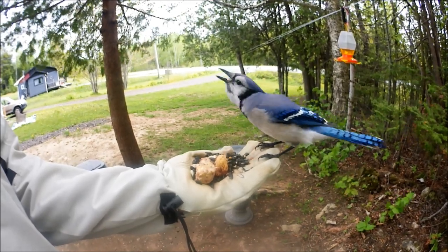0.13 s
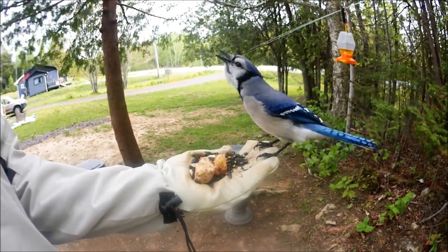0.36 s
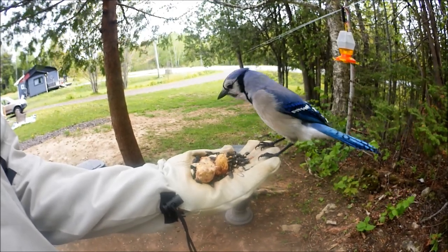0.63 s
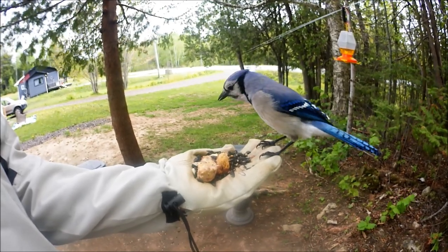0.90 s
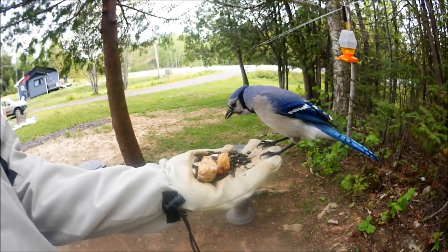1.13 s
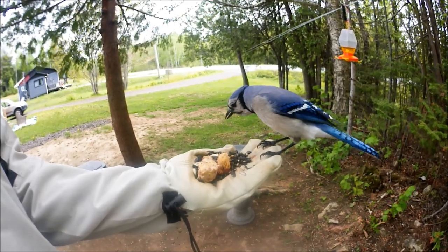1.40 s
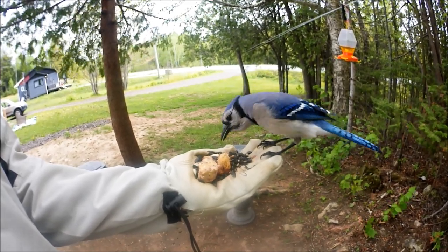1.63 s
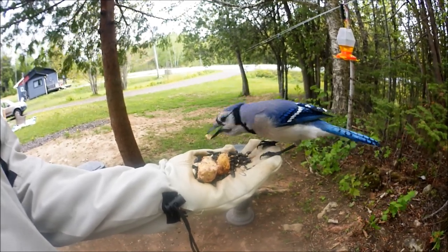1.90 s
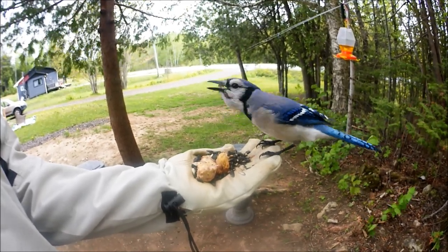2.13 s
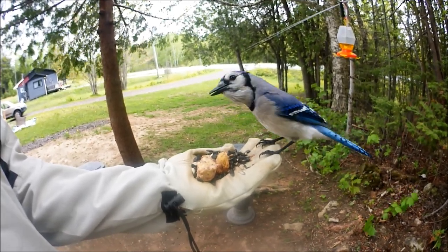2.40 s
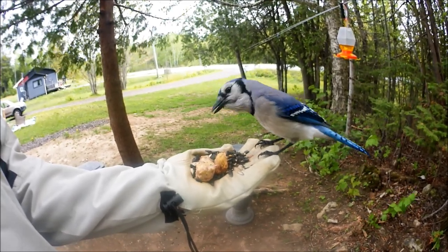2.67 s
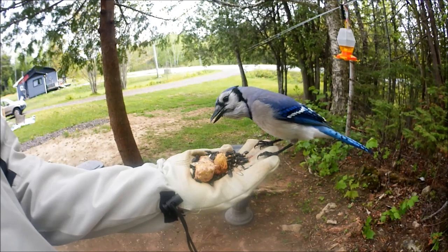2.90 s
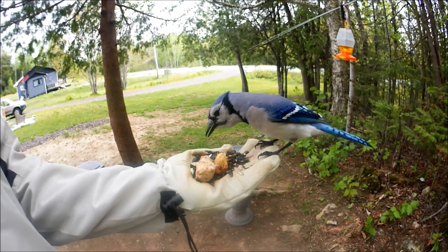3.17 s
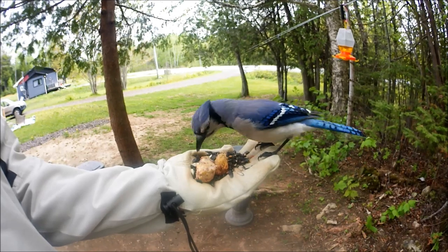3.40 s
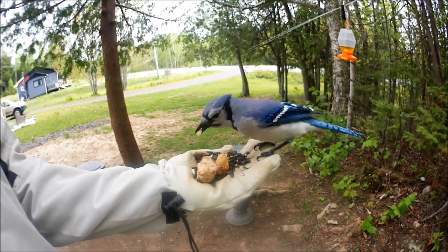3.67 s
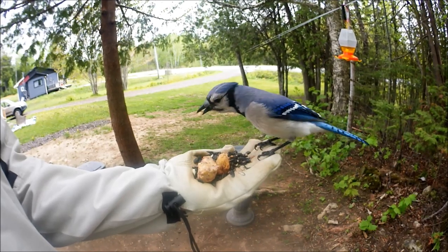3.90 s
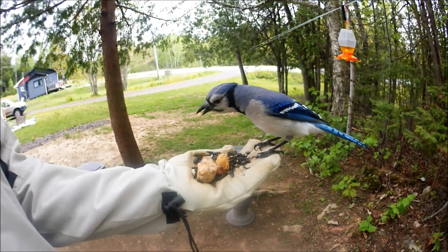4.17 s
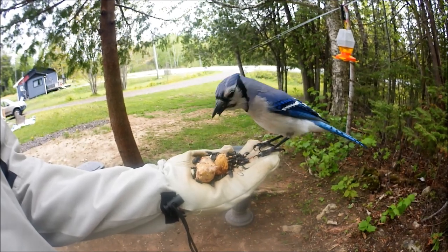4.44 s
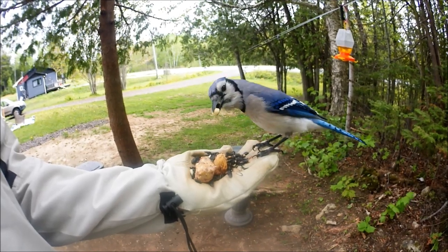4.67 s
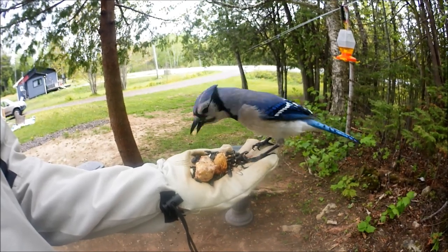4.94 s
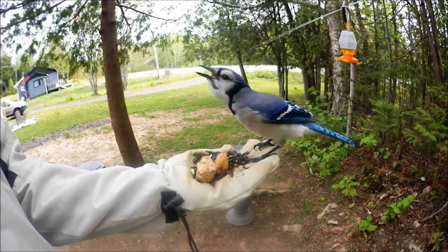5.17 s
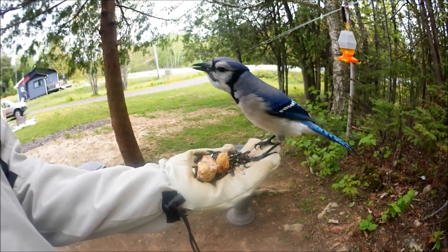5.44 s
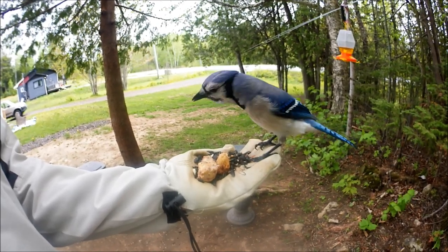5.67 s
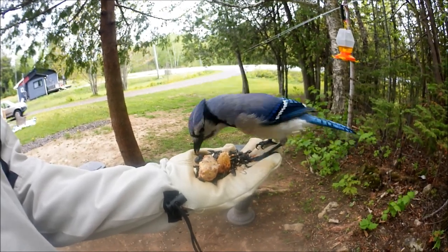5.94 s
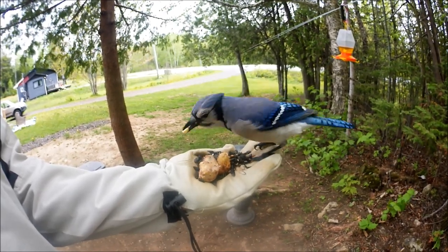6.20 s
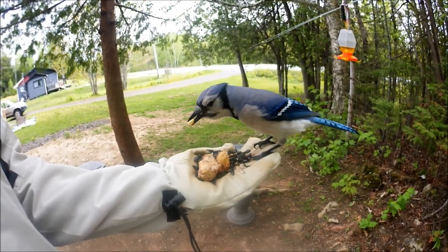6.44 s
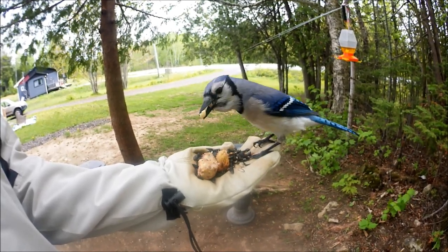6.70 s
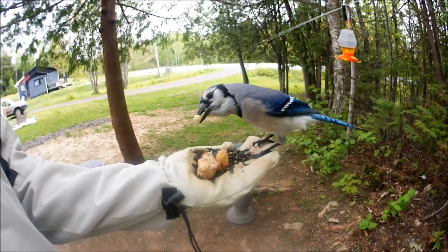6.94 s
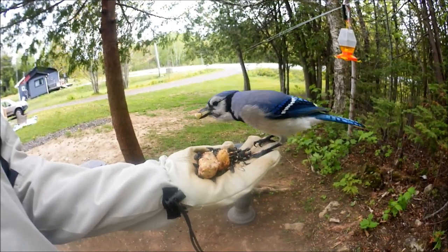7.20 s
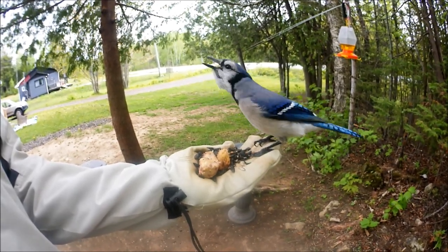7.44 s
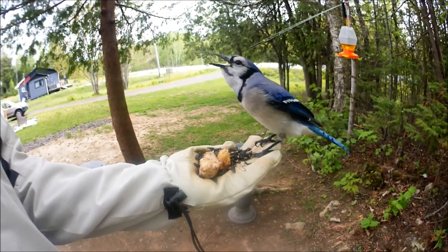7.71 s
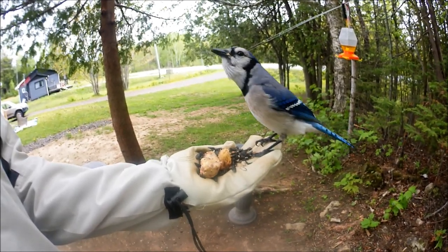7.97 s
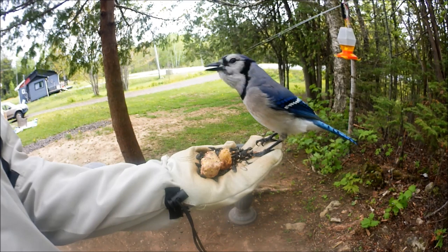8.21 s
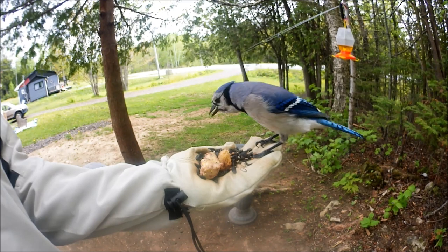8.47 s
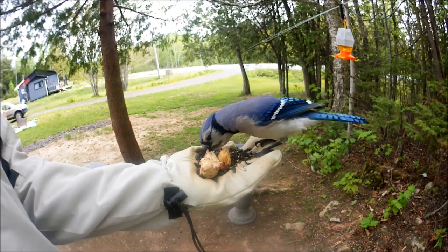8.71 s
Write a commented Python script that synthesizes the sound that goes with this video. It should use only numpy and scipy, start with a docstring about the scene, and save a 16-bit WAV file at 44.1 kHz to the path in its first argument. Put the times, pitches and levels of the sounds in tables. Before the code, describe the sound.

Outdoors at a woodland edge, a hand-held stereo microphone is struck by lumpy low wind thumps for the first second. The wind drops to faint puffs, then calm. Small songbirds whistle, chirp and buzz, thickening into a quick sliding warble midway, then thinning. A jay close by makes small hollow clicks cracking seeds, over soft hiss and distant traffic hum.

```python
"""Small songbirds whistle, warble and buzz among trees: gliding sines and fast sweeps, scattered by the leaves.
A jay close by clicks seeds in its bill, edges ringing a small cavity, and rustles in grainy bursts of treble.
A far flock blurs into twitter. Gusts buffet the two microphone ports of a hand-held camera at first and
die away, as lumpy noise and single eddies; distant traffic hums under the preamp's hiss and a faint whine."""
import sys
import numpy as np
from scipy import signal
from scipy.fft import rfft, irfft
from scipy.io import wavfile
from scipy.ndimage import uniform_filter1d, map_coordinates

SR = 44100
rng = np.random.default_rng(int(sys.argv[2]) if len(sys.argv) > 2 else 0)


def ratio_of_db(decibels):
    """Turn decibels (scalar or array-like) into linear amplitude factors; 0 dB maps to 1."""
    return 10 ** (np.asarray(decibels, float) / 20)


def bounce(signal):
    """Save signal as a 16-bit WAV file at the path given by the first command-line argument."""
    frames = np.transpose(np.atleast_2d(signal))
    limited = np.clip(frames, -1, 1)
    pcm = np.round(limited * 32767).astype(np.int16)
    wavfile.write(sys.argv[1], SR, pcm)


N = 389844
TIME = np.arange(N) / SR
PORTS = np.array([[1], [-1]])  # signs of the left and right port

# spectrum of floor noise: (frequency [Hz], relative density [dB])
FLOOR_SPECTRUM = [(15, -50), (25, -23.5), (194, -1.5), (380, 3), (2130, -5), (3280, -6.5), (4290, -9),
                  (5620, -2.5), (8200, -12), (11600, -10.5), (14100, -12.5), (15600, -18.5)]
# how alike the floor is at both ports: (frequency [Hz], left-right correlation [0..1])
FLOOR_CORRELATION = [(60, 0.49), (300, 0.44), (1400, 0.27), (6000, 0), (16000, 0)]
# spectrum of wind turbulence: (frequency [Hz], relative density [dB])
WIND_SPECTRUM = [(15, -56), (25, 7), (80, -9), (160, 0.5), (338, -5.5), (712, -9.5), (1190, -21.5),
                 (1770, -30), (2620, -38), (3500, -44), (4550, -53), (7700, -120)]
# gusts on the ports: (start [s], hold [s], left rumble before trim [dB], right rumble before trim [dB])
GUST_HOLDS = [(0.0, 0.13, -29.5, -25), (0.174, 0.042, -32.5, -28), (0.234, 0.045, -27.5, -31),
              (0.401, 0.063, -33, -28.5), (0.536, 0.012, -28, -20), (0.57, 0.054, -26, -19),
              (0.635, 0.041, -21.5, -27.5), (0.709, 0.015, -37, -28), (0.777, 0.078, -32, -28.5),
              (0.883, 0.028, -32.5, -24), (1.007, 0.13, -50.5, -39.5), (1.088, 3.45, -67, -60),
              (1.526, 0.27, -62, -50), (1.93, 0.2, -69, -47.5), (2.193, 0.197, -57, -46.5),
              (2.534, 0.093, -58, -46.5), (2.791, 0.061, -53, -43.5), (3.242, 0.13, -48.5, -41.5),
              (3.444, 0.02, -61, -41), (3.558, 0.031, -49, -40.5), (3.767, 0.091, -48, -38.5)]
# hardest single eddies: (time [s], peak of the thump [dB], port struck [L or R])
HARD_EDDIES = [(.016, -13, "R"), (0.042, -5, "R"), (.071, -6, "R"), (0.084, -14, "L"), (.108, -14, "L"),
               (.13, -15, "R"), (0.135, -14, "L"), (0.173, -18, "R"), (0.2, -18, "L"), (.207, -13.5, "R"),
               (.247, -10, "L"), (.248, -15, "R"), (.267, -15.5, "R"), (.295, -19, "R"), (.413, -13.5, "R"),
               (0.441, -19, "L"), (0.505, -17.5, "R"), (0.539, -13.5, "R"), (.562, -14, "R"),
               (0.565, -25, "L"), (0.578, -4, "R"), (0.608, -8.5, "L"), (.613, -8, "R"), (0.639, -6, "L"),
               (0.656, -6.5, "R"), (.658, -4, "L"), (0.679, -20, "L"), (.714, -14, "R"), (0.75, -20, "R"),
               (.783, -21, "R"), (0.8, -18, "R"), (0.821, -20, "R"), (0.833, -17, "L"), (0.885, -13, "R"),
               (0.91, -10.5, "R"), (2.331, -23, "R"), (2.566, -28, "R"), (2.833, -26, "R"),
               (3.271, -27, "L"), (3.315, -28, "L"), (3.336, -21.5, "R"), (3.347, -18, "R"),
               (3.444, -27.5, "R"), (3.575, -26, "R"), (3.78, -26.5, "L"), (3.802, -24, "R"),
               (3.846, -25, "R")]
# far flock before the trees: (time [s], low singers' level [dB], high singers' level [dB])
FLOCK_LEVELS = [(0.0, -53.5, -56), (.47, -58.5, -50), (.75, -62, -70), (1.4, -67, -79), (2.02, -54, -53.5),
                (2.31, -51, -53.5), (2.95, -49.5, -51), (3.25, -55, -63), (3.65, -47.5, -44),
                (4.0, -51.5, -55.5), (4.6, -43.5, -54), (4.9, -43.5, -76), (5.2, -48.5, -59),
                (5.55, -44, -49), (5.95, -61.5, -53), (6.6, -82, -64), (7.3, -55.5, -87),
                (7.68, -62, -54.5), (8.64, -63.5, -74), (8.84, -51, -44)]
# dry rustles close by, perhaps feathers: (start [s], length [s], centre [Hz], level [dB])
RUSTLE_BURSTS = [(0.322, 0.074, 7000, -54), (4.582, .035, 9500, -51.5), (4.69, 0.047, 8260, -51)]
# seeds cracked in the bill: (time [s], ring peak before panning [dB], cavity pitch [Hz], edge over ring [dB])
SEED_CRACKS = [(0.182, -30, 2800, -7.5), (0.3077, -30.5, 2920, -3), (0.4315, -32.5, 2980, -2),
               (0.554, -28, 3050, -11), (0.6428, -28, 3140, -5), (2.3283, -28.5, 3200, -8),
               (3.6566, -30.5, 2500, 5), (2.428, -33, 2800, -12), (3.734, -39, 2600, 9),
               (5.0217, -35, 3420, -2), (5.3148, -21, 3140, -9.5), (5.4241, -26, 3020, -11),
               (5.4298, -29, 2700, -15), (5.7092, -34.5, 2710, -8), (6.1565, -29.5, 2400, 4),
               (6.198, -41, 2640, 7), (7.2681, -36.5, 3900, 5), (7.4986, -24.5, 2800, -13),
               (7.6145, -35.5, 2440, -20), (7.833, -36.5, 2560, -8), (7.9446, -32, 2430, -16),
               (8.0882, -39, 3420, 10)]
# nearest singer, one table a phrase: (time [s], pitch [Hz], level before rasp and panning [dB])
WARBLE_PHRASES = [
    [(4.219, 3130, -40), (4.232, 3400, -36), (4.253, 4150, -38), (4.268, 3850, -34), (4.285, 2870, -34),
     (4.298, 2523, -54), (4.312, 2910, -39), (4.33, 3160, -29), (4.338, 2694, -39), (4.35, 3456, -33),
     (4.365, 3510, -31.5), (4.385, 3450, -38)],
    [(4.483, 3820, -44), (4.513, 3050, -27.5), (4.54, 2680, -42), (4.565, 3160, -29.5), (4.574, 3230, -40)],
    [(4.575, 4220, -50), (4.591, 3390, -33.5), (4.615, 2700, -35.5), (4.628, 2700, -47), (4.644, 3135, -32),
     (4.651, 2670, -43), (4.685, 2460, -37), (4.71, 2410, -48)],
    [(4.8, 2740, -50), (4.815, 3100, -33.5), (4.824, 3504, -35), (4.837, 3030, -33), (4.865, 2660, -43)],
    [(4.884, 3080, -46), (4.892, 3363, -38), (4.901, 3795, -50), (4.915, 3280, -30), (4.935, 2575, -46),
     (4.948, 2544, -43), (4.963, 2740, -32), (4.977, 2640, -41)],
    [(5.042, 3480, -49), (5.052, 3314, -29.5), (5.062, 2830, -46), (5.074, 3340, -35), (5.088, 4180, -43),
     (5.103, 4450, -33), (5.118, 4110, -41), (5.134, 3840, -34)],
    [(5.13, 3410, -44), (5.144, 3060, -35.5), (5.182, 2850, -32.5), (5.215, 2760, -37), (5.232, 2450, -48)],
    [(5.222, 2820, -39), (5.236, 3220, -30), (5.248, 3820, -44), (5.26, 3090, -33), (5.278, 2850, -44)],
    [(5.404, 4180, -46), (5.414, 4650, -36), (5.435, 3750, -37.5), (5.452, 3400, -39), (5.462, 3400, -55)],
]
# whistled notes: (start [s], length [s], start pitch [Hz], end pitch [Hz], level before distance and trim [dB])
WHISTLED_NOTES = [(0.222, 0.016, 5260, 5550, -43.5), (0.658, 0.023, 3320, 3500, -44.5),
                  (0.842, 0.057, 4640, 3620, -49.5), (0.852, 0.031, 5140, 4480, -54),
                  (0.978, 0.033, 5870, 4700, -51), (0.982, 0.044, 4550, 3940, -48),
                  (1.014, 0.026, 3980, 3240, -53.5), (1.107, 0.081, 4520, 3320, -50.5),
                  (1.165, 0.015, 5000, 3870, -42), (1.181, .01, 5500, 5410, -42),
                  (1.19, 0.027, 5300, 3750, -43.5), (1.196, 0.033, 6660, 5620, -51),
                  (1.147, 0.042, 4580, 5080, -48.5), (1.228, 0.067, 5740, 5300, -51),
                  (1.263, 0.031, 4000, 5100, -51), (1.289, 0.018, 4860, 4670, -42.5),
                  (1.302, 0.025, 4650, 3920, -49.5), (1.534, 0.023, 3360, 3570, -56.5),
                  (1.596, 0.024, 4500, 4900, -50.5), (1.672, 0.034, 3390, 3570, -59),
                  (1.817, 0.027, 3620, 3450, -54), (1.888, 0.018, 4590, 5030, -46),
                  (1.545, 0.018, 5200, 4740, -54), (1.692, 0.038, 5470, 4600, -57),
                  (2.011, 0.035, 4240, 4105, -52.5), (2.097, 0.047, 3200, 2490, -53),
                  (2.148, .015, 4700, 4900, -43), (2.156, 0.047, 4990, 3460, -43),
                  (2.221, 0.064, 5470, 4560, -42.5), (2.26, 0.057, 5240, 4480, -48),
                  (2.269, 0.048, 4360, 3165, -43), (2.29, 0.021, 3620, 3250, -51),
                  (2.378, 0.034, 3750, 4380, -56), (2.379, 0.018, 5260, 5330, -51.5),
                  (2.468, 0.019, 3230, 3370, -53), (2.657, .02, 3950, 3970, -54),
                  (2.498, 0.043, 3820, 4490, -53), (2.669, 0.023, 5600, 4560, -44),
                  (2.774, 0.028, 4500, 4700, -53), (2.83, 0.048, 5060, 4430, -51),
                  (2.874, 0.023, 4600, 4600, -60), (2.767, 0.092, 2535, 2794, -55),
                  (2.781, 0.049, 6150, 4900, -41), (2.948, 0.022, 4440, 5440, -47.5),
                  (2.912, 0.036, 2980, 3520, -55), (2.999, 0.13, 2920, 2680, -54.5),
                  (3.0, 0.064, 5980, 4670, -46), (3.227, 0.033, 6120, 5600, -53.5),
                  (3.27, .022, 5600, 4260, -51), (3.452, 0.029, 6170, 5640, -46),
                  (3.455, 0.033, 2570, 3070, -52), (3.561, 0.088, 4030, 5620, -45),
                  (3.585, 0.051, 3200, 4360, -46.5), (3.504, .025, 5750, 5750, -55),
                  (3.665, .03, 5560, 5500, -48), (3.722, 0.061, 4680, 4730, -48.5),
                  (3.803, .02, 2830, 2940, -46), (3.722, 0.049, 2800, 2400, -57),
                  (3.759, 0.03, 3860, 5000, -49), (3.763, 0.032, 2460, 3350, -45),
                  (3.773, 0.027, 4900, 5170, -42.5), (3.795, 0.048, 5240, 3700, -48.5),
                  (3.862, 0.051, 3090, 2510, -45), (3.89, 0.044, 5000, 6460, -42.5),
                  (3.919, 0.031, 2480, 3270, -41), (3.951, 0.024, 3066, 2900, -39.5),
                  (3.968, 0.017, 3050, 2600, -51), (4.015, 0.016, 3680, 3800, -53),
                  (4.03, 0.021, 3900, 2650, -39.5), (4.046, .015, 3060, 3700, -39),
                  (4.053, 0.024, 3520, 2970, -40.5), (4.086, 0.027, 3520, 3620, -46),
                  (4.125, 0.042, 4030, 4730, -42), (4.165, 0.018, 5700, 5070, -39),
                  (4.244, 0.036, 5780, 6240, -42.5), (4.243, 0.051, 7580, 6860, -52),
                  (4.411, 0.037, 3560, 4320, -43), (4.425, 0.025, 5860, 6070, -41.5),
                  (4.423, 0.041, 4730, 3830, -38.5), (4.46, 0.036, 3930, 4360, -44),
                  (4.595, 0.018, 6010, 5660, -38.5), (4.678, 0.032, 5700, 4040, -48),
                  (4.769, 0.011, 3950, 4540, -43), (4.779, 0.018, 4750, 3580, -43),
                  (4.843, 0.025, 4130, 4020, -51), (4.863, 0.032, 3710, 3760, -43.5),
                  (5.028, 0.019, 4210, 3930, -43.5), (5.114, 0.019, 4430, 4520, -45.5),
                  (5.151, 0.048, 8140, 6260, -50.5), (5.367, 0.014, 5520, 4630, -43.5),
                  (5.537, 0.035, 3190, 2360, -58), (5.659, 0.04, 5370, 4140, -41.5),
                  (5.668, 0.029, 3900, 2380, -52), (5.772, 0.04, 4900, 3460, -45),
                  (5.984, 0.047, 6570, 4900, -43.5), (6.063, 0.042, 2890, 2880, -59.5),
                  (6.097, .035, 3900, 4020, -58), (6.145, 0.039, 7030, 7400, -49),
                  (6.184, 0.046, 7550, 5830, -50), (6.206, 0.062, 6330, 4740, -46.5),
                  (6.402, 0.061, 6960, 4460, -47), (6.605, 0.012, 6420, 4380, -43),
                  (6.69, 0.045, 3380, 2480, -50), (6.84, .03, 4987, 4850, -46),
                  (6.854, 0.054, 4930, 3200, -42), (6.997, 0.043, 4120, 2770, -51),
                  (7.039, 0.05, 2860, 2920, -59), (7.121, 0.046, 3240, 3820, -49),
                  (7.282, 0.031, 3850, 3900, -59), (7.304, 0.034, 3970, 3600, -54),
                  (7.307, 0.059, 2765, 3650, -50), (7.413, 0.033, 4860, 4030, -52),
                  (7.48, 0.05, 5600, 6480, -48), (7.683, .036, 3110, 2300, -56),
                  (7.682, 0.013, 4700, 4550, -56), (7.801, .022, 3610, 3440, -55),
                  (7.694, 0.028, 5600, 4820, -49), (7.768, 0.027, 4750, 3940, -50),
                  (7.856, 0.055, 4810, 4450, -46), (7.888, 0.051, 4490, 3450, -48.5),
                  (7.954, 0.022, 3500, 3540, -54), (8.002, 0.032, 4800, 4390, -51),
                  (8.045, 0.031, 3750, 3000, -54), (8.097, 0.02, 3410, 3560, -57.5),
                  (8.166, 0.038, 4470, 4900, -53), (8.245, 0.036, 3485, 3430, -57.5),
                  (8.273, 0.04, 3350, 2270, -59), (8.33, 0.042, 5600, 5060, -50.5),
                  (8.353, 0.055, 4810, 4060, -47), (8.415, 0.084, 4980, 3720, -49.5),
                  (8.58, 0.054, 4350, 3060, -54), (8.6, 0.052, 5440, 5050, -44),
                  (8.636, 0.041, 5140, 4360, -49), (8.741, 0.013, 4160, 4000, -49.5),
                  (8.747, 0.021, 5370, 5380, -46.5), (8.763, 0.023, 5400, 4770, -48.5),
                  (8.777, 0.077, 5010, 4080, -46)]
# buzzy calls: (start [s], length [s], sweep width [Hz], level before distance and trim [dB])
BUZZY_CALLS = [(0.252, 0.013, 2480, -41), (0.314, 0.073, 2210, -46), (0.462, 0.03, 1970, -40),
               (0.641, 0.036, 3050, -39), (1.47, 0.022, 2960, -49.5), (1.611, 0.021, 2500, -48.5),
               (1.76, 0.014, 3000, -42), (1.901, 0.017, 2920, -42), (2.044, 0.045, 2960, -47.5),
               (2.445, 0.067, 1980, -45), (2.957, 0.091, 2010, -44.5), (3.251, 0.048, 2510, -49.5),
               (3.463, 0.049, 2500, -43), (3.648, 0.021, 6140, -41.5), (3.887, 0.042, 2190, -44.5),
               (4.051, 0.086, 2500, -45), (4.271, 0.039, 3020, -40.5), (4.435, 0.044, 1460, -43),
               (4.563, 0.038, 2000, -43), (4.68, .05, 3020, -45.5), (5.188, 0.038, 1990, -45),
               (5.329, 0.088, 2150, -43), (6.14, 0.017, 5700, -49), (7.499, 0.015, 1500, -42),
               (7.693, 0.016, 2000, -48), (7.875, 0.05, 1990, -47), (8.015, 0.033, 2500, -45.5),
               (8.177, 0.022, 2000, -46), (8.322, 0.058, 1740, -47.5), (8.588, 0.084, 1200, -51),
               (8.79, 0.032, 5700, -37.5)]
# balance of the direct song: (time [s], left minus right [dB])
SONG_BALANCE = [(0.0, -1), (1.33, 0), (3.59, 0), (4.2, -1), (5.3, -0.5), (5.8, 2.5), (6.47, -1.5),
                (8.84, 0)]
# returns from the nearest trunks: (delay [s], level [dB])
TRUNK_RETURNS = [(.006, -11), (.012, -14), (.021, -16)]

FLOOR_DB = -49.5
WHINE_HZ, WHINE_DB = 11326, -87
GUST_RISE_DB_S, GUST_FALL_DB_S, CALM_DB = 446, 698, -80
RUMBLE_TRIM_DB = 1.43
SMALL_EDDY_DB, SMALL_EDDY_SPREAD_DB = 7, 8  # middle peak over the untrimmed rumble, and reach either side
TEAR_DB = -11  # ragged upper band of the strongest gusts, against the untrimmed rumble
RUSTLE_RATE = 320  # turns a second of the leaves' scattering
FLOCK_CLEAR_DB = -7  # part of the flock heard through gaps between the trees
LEFT_LAG = 2  # samples by which the song reaches the left port late
WARBLE_LEFT_DB, WARBLE_SMOOTH_S = 3.5, .004  # left minus right; smoothing of pitch and level
WARBLE_ECHO_DB, WARBLE_RASP_DB = -5, 1.3
RISE_DONE = .6  # share of a rising glide covered in its first half
FALL_BEND_HZ = 1e4  # a fall covers half its glide, plus span over this, in its first half
FADE_DB, RASP_DB = 1.5, 4.5  # breath lost from start to end; quick unevenness of the voice
BUZZ_HZ, BUZZ_BLUR_HZ = 5700, 600  # middle pitch and its quick wander
WETTER_DB_PER_DB, NEAREST_DB = .12, -41  # shift from direct to scattered; level at which there is none
NEAR_LEAVES_DB, SONG_ECHO_DB = -8, -3  # scatter from the closest branches and the far trunks


def curve(table, column):
    """One column of a timed table, at every sample."""
    rows = np.array(table, float)
    return np.interp(TIME, rows[:, 0], rows[:, column])


def on_log_axis(table):
    """A table over frequency, drawn on a log axis at every FFT bin."""
    rows = np.array(table, float)
    bins_hz = np.fft.rfftfreq(N, 1 / SR) + 1
    return np.interp(np.log(bins_hz), np.log(rows[:, 0]), rows[:, 1])


def unit(x):
    """Scaled to rms 1."""
    return x / np.sqrt(np.mean(x ** 2))


def band(x, lo_hz, hi_hz, order=2):
    """Butterworth band-pass."""
    edges_hz = [max(lo_hz, 20), min(hi_hz, .45 * SR)]
    return signal.sosfilt(signal.butter(order, edges_hz, "band", fs=SR, output="sos"), x)


def walk(rate, count=N):
    """Smooth chance with about rate turns a second and a spread near 1."""
    knots = int(count * rate / SR) + 4
    return map_coordinates(rng.standard_normal(knots), [np.arange(count) * rate / SR], order=3)


def add(out, s, sound):
    """Mix a sound in at time s."""
    i = max(int(s * SR), 0)
    out[..., i:i + sound.shape[-1]] += sound[..., :N - i]


def sine(hz):
    """A sine of rms 1 that follows a pitch curve."""
    return np.sqrt(2) * np.sin(2 * np.pi * np.cumsum(hz) / SR)


def trees(x, t60, wet_db, gap_s, rustle=RUSTLE_RATE):
    """Trunks and moving leaves smear the pitch, then add a decaying noise tail, unrelated at each port."""
    t = np.arange(int(t60 * SR)) / SR
    tail = rng.standard_normal((2, len(t))) * ratio_of_db(-60 * t / t60) * np.minimum(t / gap_s, 1)
    tail *= ratio_of_db(wet_db) / np.sqrt(np.sum(tail ** 2, axis=1, keepdims=True))
    smeared = x * walk(rustle) * np.ones((2, 1))
    return signal.fftconvolve(smeared, tail, axes=1)[:, :N]


def whistle(length, start_hz, end_hz, done, edge):
    """A syrinx sine gliding on a parabola, quicker at first when done is over a half; rms near 1 at its height."""
    reach = 1 + 2 * edge
    u = np.linspace(-reach, reach, int(length * reach * SR))
    hz = start_hz + (end_hz - start_hz) * (done + u / 2 + (.5 - done) * u ** 2)
    return signal.windows.tukey(len(u), .6) * ratio_of_db(-FADE_DB * u / 2) * sine(hz)


def floor():
    """Far traffic below, smooth preamp hiss above, and a faint steady whine."""
    like = np.clip(on_log_axis(FLOOR_CORRELATION), 0, 1)
    mid, side = rfft(rng.standard_normal((2, N))) * ratio_of_db(on_log_axis(FLOOR_SPECTRUM))
    noise = unit(irfft(np.sqrt(1 + like) * mid + PORTS * np.sqrt(1 - like) * side, N))
    whine = np.sqrt(2) * np.sin(2 * np.pi * WHINE_HZ * TIME)
    return ratio_of_db(FLOOR_DB) * noise + ratio_of_db(WHINE_DB) * whine


def rumble_db(port):
    """Each gust swells, holds and dies away into calm air."""
    db = np.full(N, 1. * CALM_DB)
    for s, length, *held_db in GUST_HOLDS:
        lost = np.maximum(GUST_RISE_DB_S * (s - TIME), GUST_FALL_DB_S * (TIME - s - length))
        db = np.maximum(db, held_db[port] - np.maximum(lost, 0))
    return db


def small_eddies(db):
    """Lesser eddies at random moments while the rumble is above calm."""
    when, size = rng.random((300, 2)).T
    moments = (when * N).astype(int)
    return [(i / SR, db[i] + SMALL_EDDY_DB + SMALL_EDDY_SPREAD_DB * (2 * z - 1))
            for i, z in zip(moments, size) if db[i] > CALM_DB]


def wind():
    """Each port has its own turbulence: a lumpy rumble plus single eddies, brighter the harder they strike."""
    colour = ratio_of_db(on_log_axis(WIND_SPECTRUM))
    out, t = np.zeros((2, N)), np.arange(-500, 700) / SR
    for port, name in enumerate("LR"):
        db = rumble_db(port)
        eddies = [row[:2] for row in HARD_EDDIES if row[2] == name] + small_eddies(db)
        bright = unit(irfft(rfft(rng.standard_normal(N)) * colour, N))
        lumpy = unit(bright * ratio_of_db(4.0 * walk(90)))
        # weak gusts keep only the low band
        strong = np.clip((db + 42.0) / 22, 0, 1)
        rumble = strong * lumpy + (1 - strong) * unit(band(lumpy, 36, 486))
        out[port] = ratio_of_db(db + RUMBLE_TRIM_DB) * rumble
        crackle = band(bright, 310, 5500, order=1)
        ragged = unit(band(bright, 820, 2700) * ratio_of_db(9 * walk(140)))
        out[port] += ratio_of_db(db + TEAR_DB) * strong ** 2 * ragged
        for (s, peak_db), (turn, pitch, where) in zip(eddies, rng.random((len(eddies), 3))):
            hz = max(252.5 + 7.76 * (peak_db + 26.0), 120) * (.75 + .7 * pitch)
            shape = 1 / np.cosh(t * hz / np.where(t < 0, .4, .8))  # strikes faster than it lets go
            tear = ratio_of_db(0.45 * peak_db + 5.5) * shape * crackle[int(where * N / 2):][:len(t)]
            thump = np.cos(2 * np.pi * (hz * t + turn))
            add(out[port], s + t[0], ratio_of_db(peak_db) * shape * (thump + tear))
    return band(out, 54, 12000)


def flock():
    """Many far birds twitter at random; at that distance most of it comes through the trees."""
    out = 0
    for column, (lo_hz, hi_hz) in enumerate([(2600, 4200), (4500, 7300)], 1):
        dry = np.zeros(N)
        for when, pitch, glide, size, long in rng.random((1000, 5)):
            hz = lo_hz + (hi_hz - lo_hz) * pitch
            step = 0.402 * (glide - .3)  # more notes fall than rise
            note = whistle(0.01516 + 0.02493 * long, hz * (1 + step), hz * (1 - step), .5, edge=0)
            add(dry, when * N / SR, ratio_of_db(11.0 * size) * note)
        out = out + unit(dry) * ratio_of_db(curve(FLOCK_LEVELS, column))
    return trees(out, 0.24, -0.46, 0.0057) + ratio_of_db(FLOCK_CLEAR_DB) * out


def rustles():
    """Dry grainy bursts of noise, about 1.3 octaves wide between gentle filter slopes."""
    out = np.zeros((2, N))
    for s, length, hz, db in RUSTLE_BURSTS:
        n = int(length * SR)
        grain = rng.standard_normal((2, n)) * ratio_of_db(3.8 * walk(300, count=n))
        burst = unit(band(grain, .6 * hz, 1.5 * hz, order=1))
        add(out, s, ratio_of_db(db) * burst * signal.windows.tukey(n, .6))
    return out


def jay():
    """Each crack is a sharp edge that rings the small cavity of the bill."""
    out, t = np.zeros(N), np.arange(900) / SR
    grits = rng.standard_normal((len(SEED_CRACKS), len(t)))
    for (s, db, hz, edge_db), grit in zip(SEED_CRACKS, grits):
        ring = np.sin(2 * np.pi * hz * t + 0.95) * ratio_of_db(-60 * t / 0.0085)
        edge = band(grit * ratio_of_db(-60 * t / 0.012), 3700, 7600, order=3)
        add(out, s, ratio_of_db(db) * (ring + ratio_of_db(edge_db) * edge / np.abs(edge).max()))
    return out * ratio_of_db(PORTS * 2.1) + trees(out, 0.11, -0.03, 0.0025)


def warbler():
    """One clear syrinx tone that slides through each phrase, heard mostly straight and from the left."""
    dry, smooth = np.zeros(N), max(int(WARBLE_SMOOTH_S * SR), 1)
    for phrase in WARBLE_PHRASES:
        s, hz, db = np.array(phrase, float).T
        t = np.arange(s[0], s[-1], 1 / SR)
        hz, db = (uniform_filter1d(np.interp(t, s, v), smooth, mode="nearest") for v in (hz, db))
        add(dry, s[0], ratio_of_db(db) * signal.windows.tukey(len(t), .1) * sine(hz))
    dry = dry * ratio_of_db(WARBLE_RASP_DB * walk(120))
    direct = np.array([np.roll(dry, LEFT_LAG), dry]) * ratio_of_db(PORTS * WARBLE_LEFT_DB / 2)
    return direct + trees(dry, 0.2, WARBLE_ECHO_DB, 0.01)


def paths(db):
    """Fainter singers are further off: less of them comes straight, more by way of the trees."""
    return ratio_of_db(db + PORTS * WETTER_DB_PER_DB * (db - NEAREST_DB))


def buzz(length, width_hz):
    """A train of very fast uneven falls across the call's range."""
    n = int(length * SR)
    falls_hz = 190 * (1 + .45 * walk(150, count=n))
    sweep = -signal.sawtooth(2 * np.pi * np.cumsum(falls_hz) / SR)
    hz = BUZZ_HZ + width_hz / 2 * sweep + BUZZ_BLUR_HZ * walk(900, count=n)
    return signal.windows.tukey(n, .5) * sine(hz)


def songbirds():
    """Whistles and buzzes; moving leaves make the direct song flutter, differently at each port."""
    song = np.zeros((2, N))  # what comes straight, what the trees scatter
    for s, length, start_hz, end_hz, db in WHISTLED_NOTES:
        done = RISE_DONE if end_hz > start_hz else .5 + (start_hz - end_hz) / FALL_BEND_HZ
        add(song, s - .08 * length, paths(db) * whistle(length, start_hz, end_hz, done, edge=0.0795))
    song = song * ratio_of_db(0.94 + RASP_DB * walk(260))
    for s, length, width_hz, db in BUZZY_CALLS:
        add(song, s, paths(db) * buzz(length, width_hz))
    flutter = ratio_of_db(1.1 * np.array([walk(85), walk(60)]))
    dry, wet = song
    # the nearest trunks throw each stroke back a few times
    dry = dry + sum(ratio_of_db(db) * walk(40) * np.roll(wet, int(lag_s * SR)) for lag_s, db in TRUNK_RETURNS)
    balance = ratio_of_db(PORTS * curve(SONG_BALANCE, 1) / 2)
    direct = np.array([np.roll(dry, LEFT_LAG), dry]) * flutter * balance
    near_leaves = trees(wet, 0.051, NEAR_LEAVES_DB, 0.0097, rustle=RUSTLE_RATE / 2)
    far_trunks = trees(wet, 0.33, SONG_ECHO_DB, 0.0082)
    return ratio_of_db(1.0) * direct + near_leaves + far_trunks


def scene():
    """Floor, wind, far flock, rustles, bill, warble and the singers in front."""
    return floor() + wind() + flock() + rustles() + jay() + warbler() + songbirds()


def roll_off(x):
    """The treble ends steeply here."""
    return signal.sosfilt(signal.butter(12, 15800, fs=SR, output="sos"), x)


def record(dry):
    """The microphones cut the deep bass and round the hardest peaks; gain control gives a little to loud gusts."""
    dry = signal.sosfilt(signal.butter(2, 60, "high", fs=SR, output="sos"), dry)
    keep = np.exp(-1 / (.06 * SR))  # level followed over 60 ms
    loud = np.sqrt(signal.lfilter([1 - keep], [1, -keep], np.mean(dry ** 2, axis=0)))
    held = dry * np.minimum(1, (ratio_of_db(-26.0) / (loud + 1e-9)) ** 0.25)
    rounded = np.tanh(1.191 * held) / 1.094
    return roll_off(rounded)


dry = scene()
out = record(dry)
bounce(out)
```